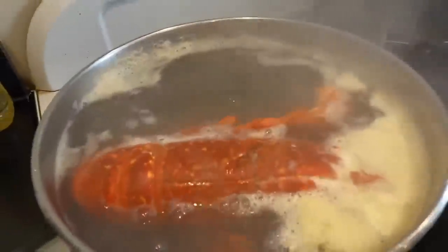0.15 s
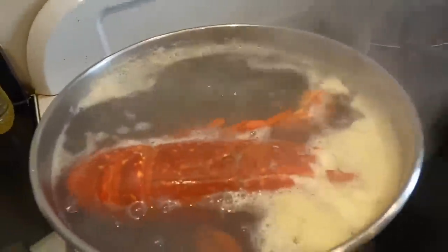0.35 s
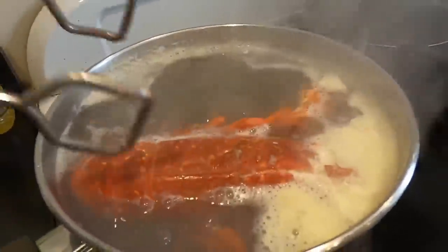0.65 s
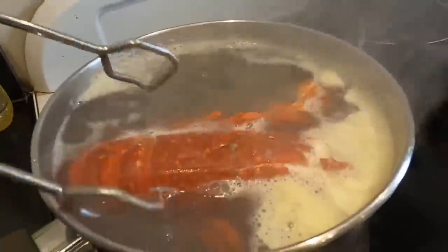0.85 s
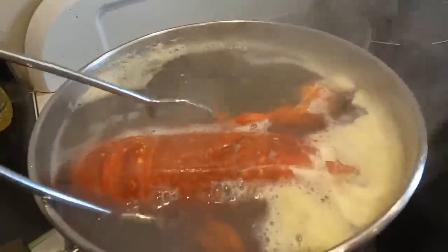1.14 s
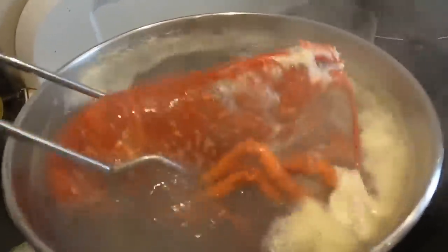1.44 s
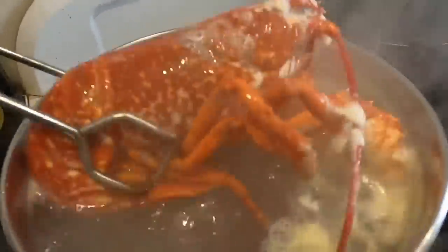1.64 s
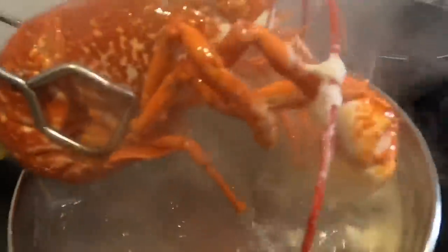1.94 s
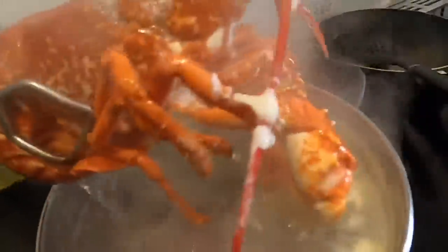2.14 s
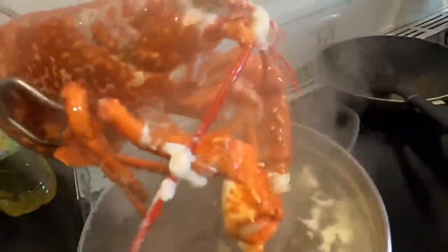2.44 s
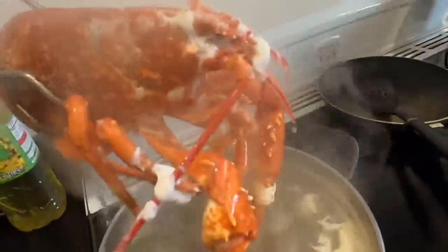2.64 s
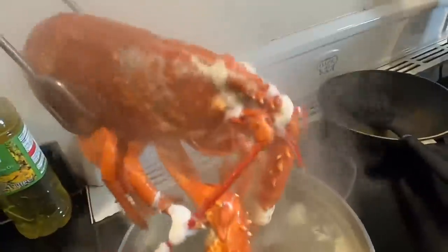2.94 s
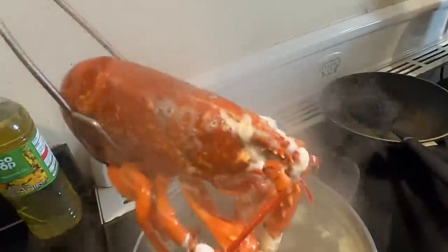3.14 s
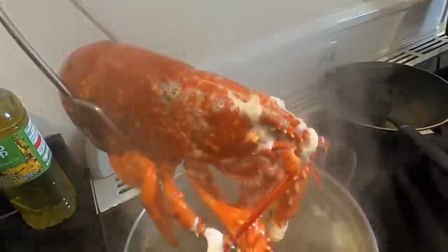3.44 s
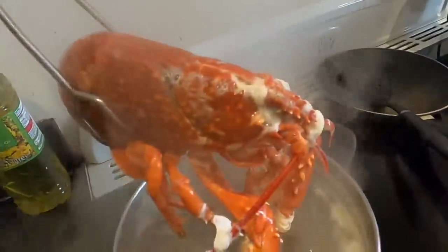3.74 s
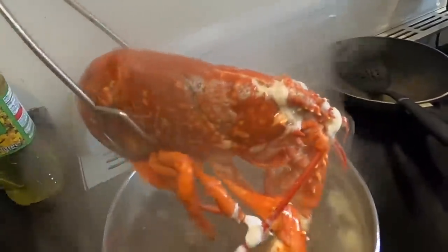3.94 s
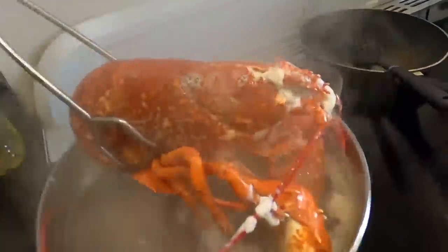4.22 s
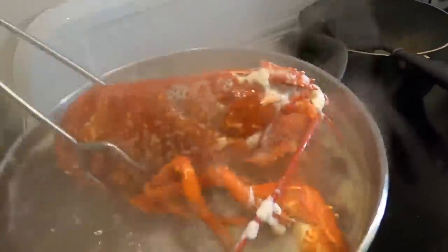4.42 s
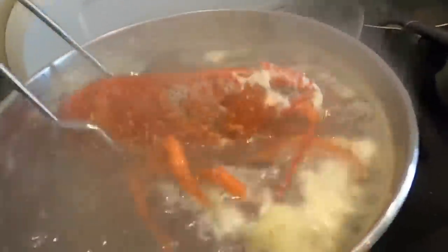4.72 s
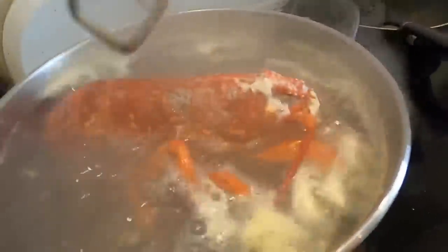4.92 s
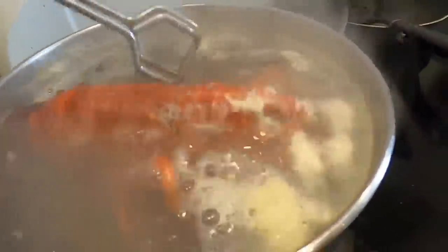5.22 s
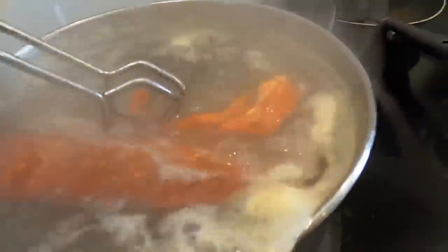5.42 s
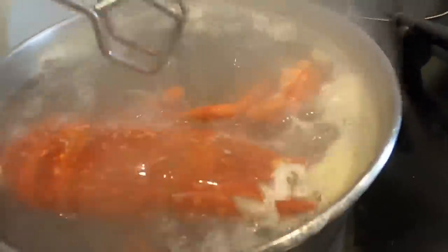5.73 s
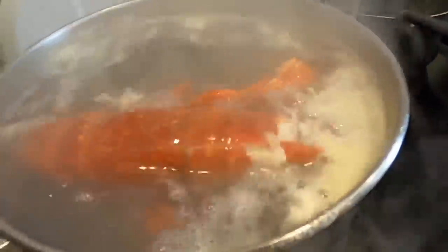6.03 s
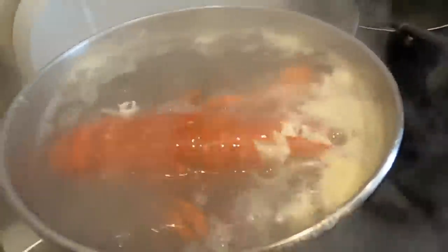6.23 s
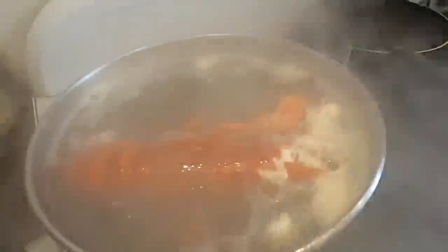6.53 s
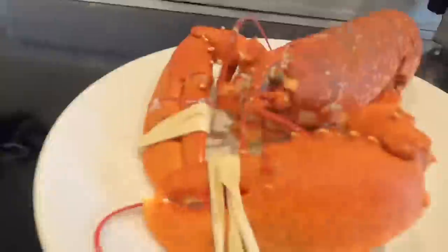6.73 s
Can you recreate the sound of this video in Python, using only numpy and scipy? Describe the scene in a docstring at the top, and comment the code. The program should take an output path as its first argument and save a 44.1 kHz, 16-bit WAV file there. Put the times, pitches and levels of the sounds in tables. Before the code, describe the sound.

Close-up water gurgles and splashes with tong knocks and dripping, then spilled water hisses and crackles on a hob above a fan rumble.

```python
"""A kitchen hob: metal tongs lift a lobster out of a simmering steel pot and lower it back, heard close up.
Taps, slips and clinks are filtered clicks, noise and dying modes; water is clouds of rising bubbles.
Foam and two spills on the hot hob are bubble clicks over coloured hiss.
Fan and hob tones, rumble and a deep throb lie underneath; everything stops abruptly at the end.
"""
import sys
import numpy as np
from scipy import signal
from scipy.fft import rfft, irfft
from scipy.io import wavfile
from scipy.ndimage import uniform_filter1d, map_coordinates

SR = 44100
rng = np.random.default_rng(int(sys.argv[2]) if len(sys.argv) > 2 else 0)


def put_to_file(sound):
    """Save the sound as 16-bit audio at rate SR, in the file named by the first command-line argument."""
    columns = np.atleast_2d(sound).T  # one column per channel
    safe = np.clip(columns, -1, 1)
    whole_steps = np.round(safe * 32767)
    wavfile.write(sys.argv[1], SR, whole_steps.astype(np.int16))


N = 302967
TIME = np.arange(N) / SR
# lobster breaks the surface, is held high, goes back in
LIFT_S, HIGH_S, BACK_S = 1.5, 2.44, 4.36
# every level_db column is relative: the functions add trims


def gain_of(db):
    """Decibels to amplitude."""
    return 10 ** (np.asarray(db) / 20)


def evened(x):
    """Scales to an rms of one."""
    return x / np.sqrt(np.mean(x ** 2) + 1e-20)


def unit(x):
    """Scales to a mean energy of one per channel."""
    return evened(x) / np.sqrt(x.shape[-1])


def read(points, hz):
    """Interpolates a spectrum on a log-frequency axis."""
    f, value = np.transpose(points)
    return np.interp(np.log(hz + 1), np.log(f + 1), value)


def bins(x):
    """Frequencies of the spectrum of x."""
    return np.fft.rfftfreq(x.shape[-1], 1 / SR)


def tinted(x, db):
    """Filters x by a gain in dB for each frequency bin."""
    return irfft(rfft(x) * gain_of(db), x.shape[-1])


def add(mix, s, sound):
    """Mixes a sound in at time s."""
    part = mix[..., max(round(s * SR), 0):][..., :sound.shape[-1]]
    part += sound[..., :part.shape[-1]]


def drift(hz):
    """Slow random wander of rms one, up to about the given rate."""
    knots = rng.standard_normal(1024)
    return evened(np.interp(2 * hz * TIME, np.arange(len(knots)), knots))


# likeness of the two channels: freq_hz, coherence (0-1)
COHERENCE = [(100, .985), (700, .965), (1400, .93), (2800, .83), (5500, .76), (9000, .3), (14000, 0)]


def ports(pair):
    """Mixes two unrelated signals into a stereo pair, alike in the bass and apart in the treble."""
    a, b = rfft(pair)
    same = np.clip(read(COHERENCE, bins(pair)), -1, 1)
    mid = a * np.sqrt((1 + same) / 2)
    side = b * np.sqrt((1 - same) / 2)
    return irfft(np.array([mid + side, mid - side]), pair.shape[-1])


def stereo_noise(size):
    """White noise passed through the channel coherence."""
    return ports(rng.standard_normal((2, size)))


def band(x, low_hz, high_hz, order=2):
    """Causal band-pass."""
    high_hz = min(high_hz, SR * .45)
    edges_hz = [min(low_hz, high_hz / 2), high_hz]
    return signal.sosfilt(signal.butter(order, edges_hz, "band", fs=SR, output="sos"), x)


def humps(modes, hz):
    """Sum of resonance peaks given as (freq_hz, width_hz, level_db)."""
    return sum(gain_of(db) / (1 + (2 * (hz - f) / width) ** 2) for f, width, db in modes)


def ring(modes, t):
    """Exponentially dying modes, each with a random phase."""
    return sum(gain_of(db - 60 * t / max(t60, .01)) * np.sin(2 * np.pi * (hz * t + rng.random()))
               for hz, db, t60 in modes)


def held(start, end, rise_s, fall_db_per_s):
    """Envelope: linear attack, hold, release in dB per second."""
    return np.clip((TIME - start) / rise_s, 0, 1) * gain_of(-fall_db_per_s * np.maximum(TIME - end, 0))


def swells(rows):
    """Gaussian rises and falls given as (centre_s, level_db, sigma_s)."""
    return sum(gain_of(db) * np.exp(-((TIME - s) / sigma) ** 2 / 2) for s, db, sigma in rows)


def pops(per_s, spread_db):
    """Random clicks: many small, a few large."""
    sizes = gain_of(spread_db * np.minimum(rng.exponential(1, N), 4))
    return (rng.random(N) < per_s / SR) * rng.choice([-1, 1], N) * sizes


def patches(x, depth_db):
    """Random patches of the spectrum swell and fade."""
    z = signal.stft(x, nperseg=512)[2]
    field = uniform_filter1d(rng.standard_normal(z.shape[1:]), size=6, axis=0)
    field = uniform_filter1d(field, size=7, axis=1)
    return signal.istft(z * gain_of(depth_db * evened(field)), nperseg=512)[1][:, :N]


def bubble(hz, cycles, rise):
    """A bubble decays by e in the given cycles; its pitch climbs by 2 * rise (fraction) in that time."""
    age = np.arange(int(5 * cycles * SR / hz)) * hz / SR / cycles
    return unit(np.sin(2 * np.pi * cycles * age * (1 + rise * age)) * np.exp(-age))


def bubbles(hz, octaves, per_s, cycles, length, rise, taper_db=6, count=24):
    """A cloud of bubbles about 1.5 * octaves either side of a pitch, weaker the further off."""
    out = np.zeros(length)
    for off in np.linspace(-1.5, 1.5, count) + rng.uniform(-.05, .05, count):
        sizes = gain_of(4.64 * np.minimum(rng.exponential(1, length), 3))
        births = (rng.random(length) < per_s / count / SR) * sizes
        grain = gain_of(-taper_db * off ** 2) * bubble(hz * 2 ** (octaves * off), cycles, rise)
        out += signal.oaconvolve(births * rng.choice([-1, 1], length), grain)[:length]
    return evened(out)


# hob and fan tones: pitch_hz, level_db
HUM_TONES = [(38, -51), (100.4, -54.5), (142.0, -53), (156.5, -55), (199.8, -65), (215.3, -56.5),
             (565.2, -60.5), (662.1, -61.5), (702, -69.5)]
# fan and boil rumble spectrum: freq_hz, density_db_per_hz (relative)
RUMBLE_COLOUR = [(50, -15), (82, -5), (105, 4.5), (150, 1.5), (230, -1.5), (350, -11.5), (700, -12.5),
                 (1100, -52.5), (3000, -62)]
# deep fan throb spectrum: freq_hz, density_db_per_hz (relative)
THROB_COLOUR = [(12, -19), (28, -5), (39, 4), (50, -6), (75, -24.5), (200, -60.5)]
RUMBLE_DB, RUMBLE_WAVER_DB = -48.5, 1.9
THROB_DB, HELD_THROB_DB = -50.5, -46.5  # steady; added while the lobster is held high
THUD_DB, THUD_HZ, THUD_PER_S = -52.5, 163.6, 38  # large steam bubbles on the pot bottom


def hum():
    """Wavering fan and mains sines, shaped-noise rumble and throb, and low bubble thuds of the boil."""
    tones = sum(gain_of(db + 2.1 * drift(4.1)) * np.sin(2 * np.pi * hz * TIME + 0.41 * drift(2.5))
                for hz, db in HUM_TONES)
    rumble = evened(tinted(stereo_noise(N), read(RUMBLE_COLOUR, bins(TIME))))
    rumble *= gain_of(RUMBLE_DB + RUMBLE_WAVER_DB * drift(6.8))
    throb = evened(tinted(stereo_noise(N), read(THROB_COLOUR, bins(TIME))))
    held_throb = gain_of(HELD_THROB_DB) * held(HIGH_S, BACK_S, rise_s=0.074, fall_db_per_s=120)
    throb *= np.hypot(gain_of(THROB_DB), held_throb)
    thuds = band(bubbles(THUD_HZ, .4, THUD_PER_S, 3.5, N, .02, count=6), 93, 330)
    return gain_of(2.5) * tones + rumble + throb + gain_of(THUD_DB) * thuds


def echoes(hz, share, count=12):
    """Gain in dB of a sound joined by its early reflections off pot, hob and wall."""
    delays_s, signs = rng.uniform(.001, .009, count), rng.choice([-1, 1], count)
    reflected = sum(sign * np.exp(-2j * np.pi * hz * s) for s, sign in zip(delays_s, signs))
    return 20 * np.log10(abs(1 + share / np.sqrt(count) * reflected) + 1e-2)


def sizzle(gains, colour, modes, level_db, treble_db, pops_per_s, spread_db, steam_db, modes_db, flutter_db):
    """Tiny steam bubbles burst over a smooth hiss, coloured by narrow resonances and reflections."""
    hz = bins(TIME)
    bursts = evened(np.array([pops(pops_per_s, spread_db), pops(pops_per_s, spread_db)]))
    source = ports(bursts + gain_of(steam_db) * rng.standard_normal((2, N)))
    colour_db = read(colour, hz) + modes_db * humps(modes, hz) + echoes(hz, .33)
    source = tinted(patches(source, depth_db=1.64), colour_db)
    body = irfft(rfft(source) / (1 + (hz / 6200) ** 12), N)
    fizz = source - body
    body_gain, fizz_gain = gains
    sound = evened(body) * body_gain * gain_of(level_db) + evened(fizz) * fizz_gain * gain_of(treble_db)
    return sound * gain_of(flutter_db * drift(29))


# foam spectrum: freq_hz, gain_db
FOAM_SPECTRUM = [(400, -6.5), (700, -17), (1300, 4), (2200, 2.5), (3200, -1.5), (4200, -3.5), (6000, -11.5),
                 (9000, -24), (12500, -40.5), (15500, -42.5)]
# thin hob whine over the foam: freq_hz, width_hz, level_db
HOB_WHINE = [(4730, 170, 10), (8700, 240, 13), (9440, 250, 0.5)]
# stirrings of the foam: start_s, end_s, level_db
STIRRINGS = [(-0.1, -0.012, -39.5), (0.18, 0.34, -51), (0.924, 2.565, -52)]
FOAM_REST_DB, FOAM_RISE_S, FOAM_SETTLE_DB_PER_S = -56.5, 0.056, 75  # level before trim
FOAM_TREBLE_DB, FOAM_TREBLE_GROWTH = -79.5, 1.56  # at rest before trim; dB per dB of foam gain


def stirred():
    """Body and treble gain of the foam: it fizzes up when stirred, brightens as it does, and settles."""
    power = sum((gain_of(db - FOAM_REST_DB) * held(start, end, FOAM_RISE_S, FOAM_SETTLE_DB_PER_S)) ** 2
                for start, end, db in STIRRINGS)
    swell = np.sqrt(1 + power)
    return gain_of(FOAM_REST_DB) * swell, gain_of(FOAM_TREBLE_DB) * swell ** FOAM_TREBLE_GROWTH


def foaming():
    """Foam sizzle that follows the stirring gains."""
    return sizzle(stirred(), FOAM_SPECTRUM, HOB_WHINE, level_db=-7.5, treble_db=-2.0, pops_per_s=900,
                  spread_db=6.0, steam_db=7.0, modes_db=1.5, flutter_db=1.5)


# steel pot wall modes: pitch_hz, level_db, t60_s
WALL_MODES = [(1040, -2.5, .3), (1284, 2, .4), (1545, 5, 0.3), (2821, -19, .3), (3430, -7.5, .55),
              (6000, -11, .4), (6783, -11, .15), (8484, -17.5, .17)]
WALL_TAP_DB, WALL_OPENING_DB = -7.5, -14  # after a tap; already dying at the start


def wall():
    """The pot wall is still ringing at the start, and rings softly after every tap."""
    out, t = np.zeros(N), np.arange(SR // 2) / SR
    add(out, 0, gain_of(WALL_OPENING_DB) * unit(ring(WALL_MODES, t)))
    for s, db, *contact in TAP_HITS:
        add(out, s + .002, gain_of(db + WALL_TAP_DB) * unit(ring(WALL_MODES, t)))
    return out


# water surges: centre_s, level_db, sigma_s, bubble_pitch_hz, spread_octaves
SURGES = [(0.01, -41, 0.032, 560, 1.18), (0.187, -34, 0.026, 1060, 0.52), (0.191, -37, 0.032, 497, 0.43),
          (0.173, -50, 0.028, 1500, 1.1), (0.248, -38.5, 0.026, 686, 0.58),
          (0.304, -41.5, 0.032, 1160, 0.73), (0.31, -48, 0.037, 2680, 0.55), (0.19, -58, 0.037, 2370, 0.67),
          (1.3, -48, 0.097, 478, 1.31), (1.461, -52.5, 0.035, 1710, 0.78), (1.49, -52, 0.03, 3000, 0.25),
          (1.597, -50, 0.007, 1900, 0.77), (1.527, -47.5, 0.032, 660, 1.23),
          (1.506, -43.5, 0.0074, 2840, 0.3), (1.621, -46.5, 0.024, 510, 1.3), (3.401, -60, 0.19, 570, 1.25),
          (4.261, -34.5, 0.014, 810, 1.17), (4.351, -43, 0.031, 870, 1.6), (4.5, -43, 0.076, 1035, 1.1),
          (4.634, -30, 0.018, 1530, 1.3), (4.698, -31.5, 0.05, 136, 0.9), (4.855, -37, 0.028, 744, 1.4),
          (4.857, -39, .018, 2970, .8), (5.338, -40.5, 0.013, 753, 0.61), (5.415, -37, 0.021, 733, 0.6),
          (5.467, -34, 0.014, 800, 1.44), (6.535, -32, 0.062, 1190, 0.99), (6.746, -29.5, 0.025, 860, 1.42)]
# air resonances in the pot: freq_hz, width_hz, level_db
AIR_MODES = [(450, 28, 2.5), (1040, 75, -9), (1270, 93, -10.5), (1530, 97, -5)]
AIR_DEPTH_DB = 8
SLOSH_PER_S, SLOSH_TAPER_DB = 2200, 10.5  # taper: weakening at one spread off centre
BUBBLE_CYCLES, SLOSH_GLIDE = 2.2, 0.028  # decay at one octave of spread; bubble rise


def water():
    """A fine simmer, and bubble clouds when water is pushed: wide ones splash, narrow ones gurgle longer."""
    simmer = band(bubbles(900, .9, 2000, 1.6, N, .016, count=12), 350, 1800)
    out = gain_of(-60.0) * evened(simmer)
    for s, db, sigma_s, hz, octaves in SURGES:
        u = np.linspace(-3, 3, int(6 * sigma_s * SR))
        octaves = max(octaves, .1)
        cycles = BUBBLE_CYCLES / np.sqrt(octaves)
        cloud = bubbles(hz, octaves, SLOSH_PER_S, cycles, len(u), SLOSH_GLIDE, SLOSH_TAPER_DB)
        surge = gain_of(db) * evened(cloud) * np.exp(-u ** 2 / 2)
        start = s - 3 * sigma_s
        add(out, start, surge[max(-round(start * SR), 0):])
    return tinted(out, AIR_DEPTH_DB * humps(AIR_MODES, bins(out)) - 2.5)


# tongs sliding on shell and rim: centre_s, level_db, sigma_s
SLIDES = [(0.01, -53, 0.044), (1.067, -57, 0.042), (1.19, -58, 0.033), (1.28, -50.5, 0.032)]
# steel tongs modes: pitch_hz, level_db, t60_s
TONG_MODES = [(964, 5, 0.089), (1956, -1, 0.18), (2870, 2.5, 0.14), (3630, 1.5, 0.089), (3860, -5, 0.2),
              (4960, 1.5, .1), (5380, -1, 0.13), (5830, -5, 0.16), (6580, -9, 0.19), (7700, -15, 0.15)]


def scrapes():
    """Stick-slip grains set the tongs singing while they slide; the ring shifts with the contact point."""
    modes = [(hz, 200, db) for hz, db, t60 in TONG_MODES] + [(3980, 230, 8), (7900, 330, -12)]
    singing = humps(modes, bins(TIME)) + gain_of(-19)
    grains = ports(np.array([pops(1800, 2.5) for side in "LR"]))
    sung = band(irfft(rfft(patches(grains, depth_db=4.5)) * singing, N), 2400, 8300)
    shifted = np.cumsum(1 + .025 * drift(14))
    warped = np.array([map_coordinates(side, [shifted], mode="wrap") for side in sung])
    return evened(warped) * swells(SLIDES)


# ticks: the shell cracking as the lobster is lifted (about 1.43-1.48 s), then the largest drops falling back:
# start_s, level_db, centre_hz
TICKS = [(1.43, -54, 2950), (1.448, -45, 1210), (1.475, -53, 2400), (1.9043, -27, 1110),
         (2.024, -35.5, 2550), (2.2913, -35, 1170), (2.3989, -24.5, 970), (2.47, -32, 1170),
         (2.52, -28, 3080), (2.566, -32, 2060), (4.7228, -22, 940)]
# single large bubbles: start_s, level_db, pitch_hz, decay_cycles
LARGE_BUBBLES = [(0.16, -33, 517, 4.5), (0.176, -30, 485, 6), (0.194, -26.5, 444, 6.4),
                 (0.165, -33, 1080, 5), (0.195, -33, 1050, 6), (0.29, -29, 706, 7.4),
                 (1.432, -50, 3400, 5.5), (1.476, -47.5, 2700, 5), (1.505, -44, 2680, 6),
                 (1.41, -43, 950, 4), (1.449, -43, 1500, 2.7), (1.538, -36, 796, 3), (1.62, -38, 480, 3),
                 (2.083, -42, 2450, 7.2), (3.335, -32, 1017, 11), (3.382, -32.5, 1200, 5.5),
                 (3.451, -26.5, 805, 5.6), (3.733, -37.5, 3650, 14), (4.011, -41.5, 2100, 6.7),
                 (4.249, -29, 1000, 2.5), (4.61, -32.5, 1500, 3), (4.638, -26, 2070, 3.4),
                 (4.848, -27.5, 604, 1.6), (4.857, -31, 960, 2.3), (5.352, -33.5, 750, 2),
                 (5.389, -33, 696, 2.4), (5.4, -27.5, 724, 3.4), (5.415, -24, 666, 1.7),
                 (5.43, -32, 692, 6.5), (5.457, -31, 613, 1.1), (5.462, -28.5, 890, 1.1),
                 (6.173, -21, 684, 0.74)]


def drips():
    """The lifted shell cracks and falling drops tick on the water, and single large bubbles ring."""
    out, impulse = np.zeros(N), np.eye(1, 1024)[0]
    for s, db, hz in TICKS:
        tick = unit(band(impulse, hz * .6, hz * 2.8))
        add(tick, .001, gain_of(-1.5) * bubble(hz, 3.6, 0.037))
        add(out, s + .001, gain_of(db + 5) * tick)
    for s, db, hz, cycles in LARGE_BUBBLES:
        add(out, s, gain_of(db + 21.0) * bubble(hz, cycles, 0.0074))
    return out


# broad resonances of every knock: freq_hz, width_hz, level_db
KNOCK_MODES = [(772, 120, -20), (1570, 470, -32), (3300, 190, -12.5), (4050, 2550, -5), (8000, 2500, 0.5)]


def push(low_db, high_db, top_db, crack_hz, crack_db, size=2048):
    """A causal (minimum-phase) click from three band levels; the spot struck adds one short resonance."""
    hz = abs(np.fft.fftfreq(size, 1 / SR))
    shape = [(20, low_db - 34.0), (250, low_db + 11), (700, low_db + 7.5), (1600, -8.5),
             (2700, high_db + 3.5), (4200, high_db - 3), (5600, top_db - 0.5), (8000, top_db - 13.0),
             (11000, top_db - 21.0), (16000, top_db - 50.0)]
    peaks_db = 11 * humps(KNOCK_MODES, hz)
    crack = crack_db * humps([(crack_hz, crack_hz * 0.28, 0)], hz)
    log_gain = np.log(gain_of(read(shape, hz) + peaks_db + crack))
    return unit(np.fft.ifft(np.exp(np.conj(signal.hilbert(log_gain)))).real)


# tongs and shell tapping the pot:
# start_s, level_db, weight_db, hardness_db, clatter_db, crack_hz, crack_db
TAP_HITS = [(0.2754, -16, -1, -9, 13, 1550, 3), (0.28, -12, -4, -7.5, 7, 3630, 10),
            (0.911, -19.5, 1, -3.5, -2, 2080, 6), (1.101, -26.5, 15, -3, -2, 1600, 1),
            (1.595, -24, 3, 1, 4, 3220, -1), (3.049, -20.5, -14, 19, -10, 4800, 13),
            (3.281, -23, 3, 16, -5, 4000, 15), (3.81, -22, -23, -2, 4, 1850, 7),
            (4.592, -21.5, -3, -3, -1, 4500, 8), (4.63, -11, 4.5, -4, -14, 1900, 10),
            (4.8466, -14, 12, -3.5, -3, 1200, 6), (5.256, -7.5, -1, -11, -1, 3450, 4),
            (5.3371, -23, 1, 11, 2, 12300, 30), (6.316, -15, 0, 3.5, -5, 2810, 10.5),
            (6.461, 0, 7, -2, -6, 3950, 15), (6.5001, -11, 4, -7, -2, 3820, 14.5),
            (6.512, -23, 9, -8.5, 6, 3900, 8), (6.711, -4, 6, 8, 6, 6230, 9),
            (6.735, -11, -12, 0, 37, 6400, 4), (6.765, -18, -7, 2.5, 10, 6500, 9.5)]
# tongs slipping on the shell: start_s, level_db, weight_db, hardness_db, length_s, crack_hz
SHELL_SLIPS = [(1.2454, -31, -5, -5, 0.007, 1020), (1.536, -26, 12, -12, 0.013, 1450),
               (1.582, -30, 3.5, -11, 0.0042, 2200), (1.602, -25.5, 21, 5, 0.0099, 1000),
               (4.248, -19.5, 12.5, 0, 0.0038, 2920), (4.648, -19, 11, 2, 0.0051, 1210),
               (4.657, -16, -5, -1, 0.006, 4160), (4.797, -29.5, 4, -5, 0.0037, 1320),
               (4.866, -26, -10, -15, .0075, 920), (5.443, -26.5, 10, 0, 0.0015, 2000),
               (5.477, -26.5, 9, 2, 0.0034, 900), (6.167, -25.5, 8.5, 8, 0.0034, 1000)]
# dull body bumps on the pot: start_s, level_db, pitch_hz
BODY_BUMPS = [(0.273, -28, 162), (1.599, -34.5, 210), (4.662, -25.5, 135), (4.848, -28.5, 230),
              (6.462, -14.5, 220), (6.713, -19.5, 186), (6.734, -22.5, 180)]
# pot modes rung by bumps: pitch_hz, level_db, t60_s
POT_MODES = [(108.9, 8, 0.21), (153, -1, 0.19), (227.7, 8, 0.2), (330.4, -2, 0.39), (483, 4.5, 0.12)]
# band levels before weight and hardness; growth in dB per dB of hardness
TAP_LOW_DB, TAP_HIGH_DB, TAP_TOP_DB, TAP_TOP_GROWTH = -21.5, -20, -29, 1
SLIP_LOW_DB, SLIP_HIGH_DB, SLIP_TOP_DB, SLIP_HIGH_GROWTH = -11, -12, -17.5, 0.51
TAP_ROOM_DB, CLATTER_ROOM_GROWTH = -12.5, 0.46  # room feed at 0 dB clatter; dB per dB of clatter


def knocks():
    """Taps: push plus clatter. Slips: micro-impact bursts. Bumps: pot modes. Returns direct and room feed."""
    direct, feed, t = np.zeros((2, N)), np.zeros(N), np.arange(SR // 4) / SR
    impulse = np.eye(1, len(t))[0]
    for s, db, weight_db, hard_db, clatter_db, crack_hz, crack_db in TAP_HITS:
        top_db = TAP_TOP_DB + TAP_TOP_GROWTH * hard_db
        contact = push(TAP_LOW_DB + weight_db, TAP_HIGH_DB + hard_db, top_db, crack_hz, crack_db)
        clatter = unit(stereo_noise(len(t)) * np.exp(-t / 0.0022))
        tap = signal.fftconvolve(impulse + gain_of(clatter_db) * clatter, contact[None])
        tap = gain_of(db + 12.0) * unit(tap)
        add(direct, s + .0015, tap)
        add(feed, s, gain_of(TAP_ROOM_DB + CLATTER_ROOM_GROWTH * clatter_db) * tap[0])
    for s, db, weight_db, hard_db, length_s, crack_hz in SHELL_SLIPS:
        grip = np.exp(-(t / max(length_s, .001)) ** 4) + 0.2 * np.exp(-t / 0.017)
        high_db = SLIP_HIGH_DB + SLIP_HIGH_GROWTH * hard_db
        contact = push(SLIP_LOW_DB + weight_db, high_db, SLIP_TOP_DB + hard_db, crack_hz, crack_db=12)
        contact = band(contact, 510, 15000)
        slip = unit(signal.fftconvolve(stereo_noise(len(t)) * grip, contact[None]))
        add(direct, s, gain_of(db + 17.5) * slip)
        add(feed, s, gain_of(db + 1.0) * slip[0])
    for s, db, hz in BODY_BUMPS:
        # favours modes near the bump's pitch
        modes = [(f, mode_db - 9 * np.log2(f / hz) ** 2, t60) for f, mode_db, t60 in POT_MODES]
        add(direct, s, gain_of(db + 24.5) * unit(band(ring(modes, t), 66, 810)))
    return direct, feed


def kitchen(x, bass_t60, middle_t60, treble_t60):
    """A small hard room: dense noise reflections, the treble dying sooner."""
    hz, t, z = signal.stft(stereo_noise(SR // 2), SR, nperseg=256)
    t60 = read([(300, bass_t60), (3500, middle_t60), (8000, treble_t60)], hz)[:, None]
    tail = signal.istft(z * gain_of(-60 * t / t60), SR, nperseg=256)[1]
    tail *= 1 - np.exp(-np.arange(tail.shape[1]) / SR / 0.0004)
    return signal.fftconvolve(x[None], unit(tail), axes=1)[:, :N]


# tong arms clinking: start_s, level_db, contact_s, brightness_db_per_octave
ARM_CLINKS = [(1.0214, -16, 0.0076, 1.5), (1.251, -31, 0.0046, -2), (1.278, -37, 0.0037, -2),
              (1.332, -36.5, 0.0076, 1), (5.336, -25, 0.0039, 9)]
CLINK_RING_DB, CLINK_GRIT_DB = -12, -1  # free ring against contact ring; grit against tone


def clinks():
    """The steel arms grate and buzz while they touch, then ring on more softly."""
    out, t = np.zeros((2, N)), np.arange(SR // 4) / SR
    grit_colour = read([(60, -8), (300, 5.5), (800, 9.5), (1500, -3.5), (5000, -5), (8000, -10.5),
                        (15000, -40)], bins(t))
    for s, db, contact_s, bright_db in ARM_CLINKS:
        touch = np.exp(-(t / max(contact_s, .001)) ** 4)
        modes = [(hz, mode_db + bright_db * np.log2(hz / 3000), t60) for hz, mode_db, t60 in TONG_MODES]
        tone = unit(ring(modes, t) * (touch + gain_of(CLINK_RING_DB)) * (1 - np.exp(-t / 0.0005)))
        grit = tinted(stereo_noise(len(t)), grit_colour)
        grit = unit(grit * (touch + 0.42 * np.exp(-t / 0.038)))
        add(out, s, gain_of(db + 10.5) * (tone + gain_of(CLINK_GRIT_DB) * grit))
    return out


TRICKLE_DB, TRICKLE_HZ, TRICKLE_PER_S, TRICKLE_FALL_DB_PER_S = -56, 1030, 500, 16.5
PATTER_DB, PATTER_PER_S = -70, 70  # bright ticks of drops landing from higher up


def trickle():
    """Water runs off the lifted shell, fading as it drains; drops tick while it hangs over the pot."""
    running = bubbles(TRICKLE_HZ, 1.2, TRICKLE_PER_S, 1.9, N, rise=.016, count=14)
    running *= held(LIFT_S, LIFT_S, rise_s=0.054, fall_db_per_s=TRICKLE_FALL_DB_PER_S)
    patter = evened(band(pops(PATTER_PER_S, 7.3), 800, 13000))
    patter *= held(LIFT_S, BACK_S, rise_s=HIGH_S - LIFT_S, fall_db_per_s=58)
    return gain_of(TRICKLE_DB) * running + gain_of(PATTER_DB) * patter


def whistle():
    """A faint wavering sine swells briefly as the shell drains."""
    pitch_hz = 1280 * (1 + 0.0113 * drift(44))
    tone = np.sqrt(2) * np.sin(2 * np.pi * np.cumsum(pitch_hz) / SR)
    return swells([(1.87, -59.5, 0.093)]) * tone


# water spilling onto the hob: lands_s, rush_db, full_boil_s, full_boil_db
HOB_SPILLS = [(2.768, -35, 3.36, -33.5), (5.72, -31, 6.12, -33)]
LANDING_S, RUSH_FALL_DB_PER_S = 0.018, 59.5
BOIL_RISE_S, BOIL_FALL_DB_PER_S = 0.25, 21.5  # heats to full boil, then dries away
FILM_DB = -46.5  # last film keeps hissing; before trim
FIZZ_DB, FIZZ_STEEPNESS, RUSH_FIZZ_DB = -14.5, 1.32, 1  # treble offset, exponent on boil, rush boost


def boiling_off(lands_s, rush_db, boil_s, boil_db):
    """Body and treble gain of a spill: a first rush, a swell to full boil, and a lingering film."""
    landed = (1 + np.tanh((TIME - lands_s) / LANDING_S / 2)) / 2
    rush = gain_of(rush_db - RUSH_FALL_DB_PER_S * np.maximum(TIME - lands_s, 0))
    heating = np.exp(-(np.minimum(TIME - boil_s, 0) / BOIL_RISE_S) ** 2 / 2)
    boil = heating * gain_of(-BOIL_FALL_DB_PER_S * np.maximum(TIME - boil_s, 0))
    body = np.hypot(rush, gain_of(boil_db) * boil)
    fizz = np.hypot(gain_of(RUSH_FIZZ_DB) * rush, gain_of(boil_db) * boil ** FIZZ_STEEPNESS)
    film = gain_of(FILM_DB)
    return landed * np.hypot(body, film), gain_of(FIZZ_DB) * landed * np.hypot(fizz, film)


def crackle(spill, level_db, hz, octaves, per_s, cycles):
    """Larger bubbles snap in a boiling puddle, following its body gain."""
    snaps = np.array([bubbles(hz, octaves, per_s, cycles, N, 0.024, count=10) for side in "LR"])
    return gain_of(level_db) * evened(ports(snaps)) * boiling_off(*spill)[0]


# resonances of the gap between pot and hob: freq_hz, width_hz, level_db
GAP_MODES = [(756, 22, -21), (1000, 130, 5.0), (1233, 80, 3.0), (1550, 120, -6.0), (2510, 70, -17.5),
             (2580, 87, -8.5), (3120, 140, -3.0), (3700, 87, -19.5), (3760, 88, -8.0), (4350, 280, -7.5),
             (4890, 140, -7.0), (5340, 120, 0.0)]
# first spill spectrum: freq_hz, gain_db
FIRST_SPECTRUM = [(180, -1.5), (300, -2), (485, -4.5), (527, -5), (573, 1), (896, -0.5), (990, -2),
                  (1400, -3.5), (1630, 2), (1950, -1.5), (2350, 2.5), (4950, -3.5), (5480, -12.5),
                  (5750, -13), (6500, -19), (6890, -22.5), (10800, -37), (12400, -37), (15800, -53)]
STEAM_SPREAD_DB = 3.2


def first_spill():
    """Sizzle coloured by the gap, with high crackle."""
    hiss = sizzle(boiling_off(*HOB_SPILLS[0]), FIRST_SPECTRUM, GAP_MODES, level_db=-1.47, treble_db=1.5,
                  pops_per_s=2700, spread_db=STEAM_SPREAD_DB, steam_db=1, modes_db=6.5, flutter_db=0.5)
    return hiss + crackle(HOB_SPILLS[0], level_db=-10, hz=4690, octaves=0.17, per_s=900, cycles=11)


# steam puffs on the hob: centre_s, level_db, sigma_s
STEAM_PUFFS = [(2.845, -38.5, 0.033), (3.005, -38.5, 0.042), (3.14, -37, 0.058), (3.88, -43, 0.0073),
               (4.43, -43.5, 0.012), (5.935, -34, 0.023)]
# drops spitting on the hob: start_s, level_db, hold_s
HOB_SPITS = [(2.769, -32, 0.012), (3.277, -31.5, 0.0085), (5.709, -33, 0.012), (5.728, -28.5, 0.023)]


def flares():
    """Short bright puffs of steam as water flashes, and drops that spit at once: shaped noise."""
    colour = [(500, -10), (2800, 6.5), (5200, 6.5), (6500, -6.5), (9000, -12), (15000, -28)]
    spits = sum(gain_of(db) * held(s, s + hold_s, rise_s=0.0024, fall_db_per_s=554)
                for s, db, hold_s in HOB_SPITS)
    steam = evened(tinted(stereo_noise(N), read(colour, bins(TIME))))
    return steam * (swells(STEAM_PUFFS) + spits)


# pitch of the second spill, sinking as the puddle spreads and climbing as it thins: time_s, pitch_hz
SEETHE_PITCH = [(5.75, 3230), (5.795, 1770), (5.86, 1790), (5.92, 2500), (6.1, 2470), (6.24, 2240),
                (6.29, 2900), (6.44, 2700)]


def seething(x, depth_db, octaves):
    """The sizzle is strongest around the pitch of its bubbles, which moves."""
    hz, t, z = signal.stft(x, SR, nperseg=512)
    away = np.log2((hz[:, None] + 1) / np.interp(t, *np.transpose(SEETHE_PITCH))) / octaves
    moving = z * gain_of(depth_db * (np.exp(-away ** 2) - .5))
    return signal.istft(moving, SR, nperseg=512)[1][:, :N]


# second spill spectrum: freq_hz, gain_db
SECOND_SPECTRUM = [(100, -39), (170, -11.5), (222, 0.5), (422, -0.5), (1270, 1.5), (1530, -2.5),
                   (1960, 0.5), (2240, -5.5), (2760, 2), (3150, -3.5), (4350, -1), (5890, -16.5),
                   (12600, -33), (14600, -42.5), (15800, -52)]


def second_spill():
    """Sizzle with lower, wider crackle, both shaped by the moving seethe."""
    hiss = sizzle(boiling_off(*HOB_SPILLS[1]), SECOND_SPECTRUM, GAP_MODES, level_db=3.5, treble_db=5.5,
                  pops_per_s=4000, spread_db=STEAM_SPREAD_DB, steam_db=-4.0, modes_db=0.0, flutter_db=1.47)
    hiss += crackle(HOB_SPILLS[1], level_db=-5, hz=2110, octaves=.6, per_s=600, cycles=3.6)
    return seething(hiss, depth_db=3.5, octaves=1.0)


def scene():
    """Hum, foam, two spills, water and knocks in the kitchen."""
    direct, feed = knocks()
    wet = water() + drips() + trickle()
    room = kitchen(feed + gain_of(-10.0) * wet, bass_t60=0.61, middle_t60=0.19, treble_t60=0.18)
    steady = hum() + foaming()
    metal = wall() + scrapes() + direct + clinks()
    hob = first_spill() + flares() + second_spill()
    return steady + metal + wet + room + whistle() + hob


# stereo side level: time_s, width_db
STEREO_WIDTH = [(0, -64), (0.85, -29), (1.0, -32.5), (2.4, -24), (2.8, -14), (3.5, -10.5), (4.25, 0.5),
                (5.7, 0.5)]
TREBLE_WIDTH_SHARE = 0.5  # share of width_db applied above 6.5 kHz
TURN_S, TURN_DB = 6.44, 2.8  # left minus right


def image(pair):
    """Narrows the stereo image early on, bass and middle most, and turns it left at the end."""
    mid, side = (pair[0] + pair[1]) / 2, (pair[0] - pair[1]) / 2
    width_db = np.interp(TIME, *np.transpose(STEREO_WIDTH))
    low = irfft(rfft(side) / (1 + (bins(side) / 6500) ** 12), N)
    side = low * gain_of(width_db) + (side - low) * gain_of(TREBLE_WIDTH_SHARE * width_db)
    turn_db = TURN_DB * np.clip((TIME - TURN_S) / .02, 0, 1)
    return np.array([mid + side, mid - side]) * gain_of(turn_db * np.array([[.5], [-.5]]))


# channel balance: freq_hz, left_minus_right_db
BALANCE = [(150, .2), (700, -.4), (1800, .8), (3000, 1.3), (5500, 0), (9000, -2.7), (14000, -4)]
STOP_S, EDGE_HZ = 6.777, 15500


def record(dry):
    """The channels differ in colour, the left lags slightly; the sound stops short; then the band limit."""
    hz, lag_s = bins(dry), np.array([[.000021], [0]])
    lean = gain_of(read(BALANCE, hz) * np.array([[.5], [-.5]]))
    heard = image(irfft(rfft(dry) * lean * np.exp(-2j * np.pi * hz * lag_s), N))
    stopped = np.clip(heard, -1, 1) * np.clip((STOP_S - TIME) / .003, 0, 1)
    low_pass = signal.firwin(255, EDGE_HZ, window=("kaiser", 9), fs=SR)
    return signal.oaconvolve(stopped, low_pass[None], "same")


dry = scene()
out = record(dry)
put_to_file(out)
```